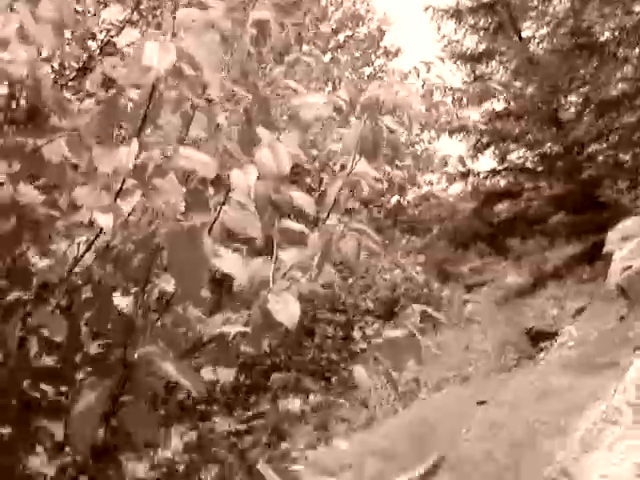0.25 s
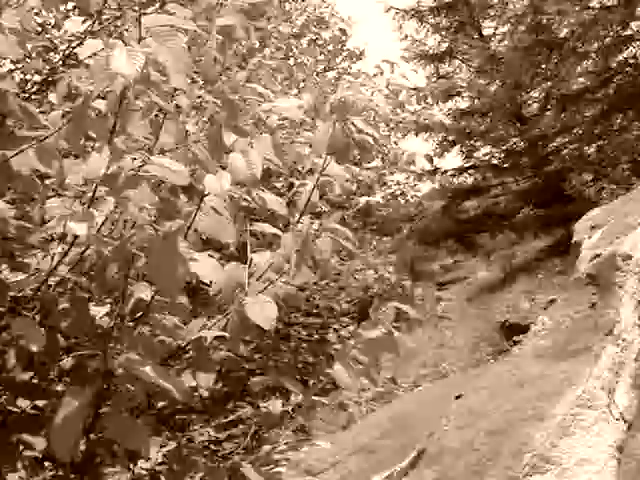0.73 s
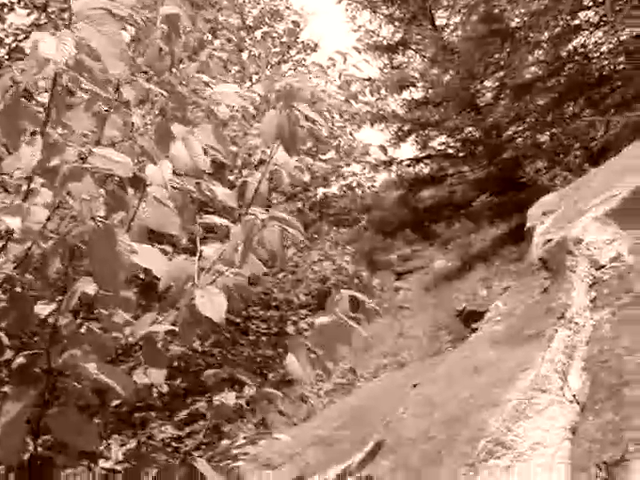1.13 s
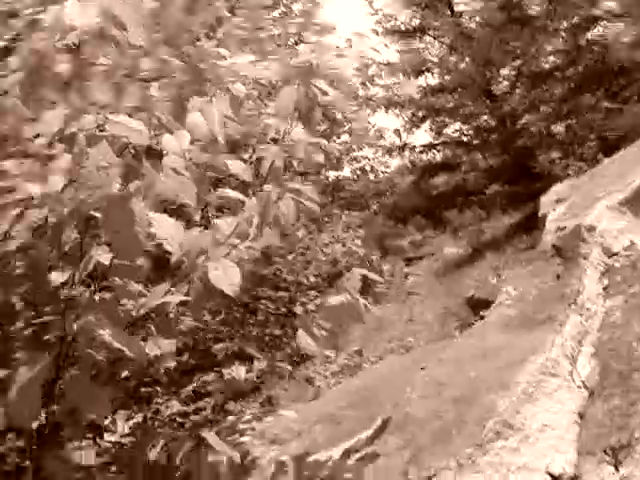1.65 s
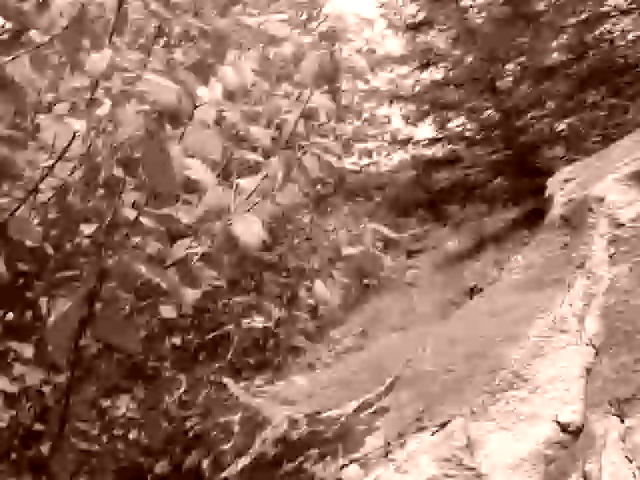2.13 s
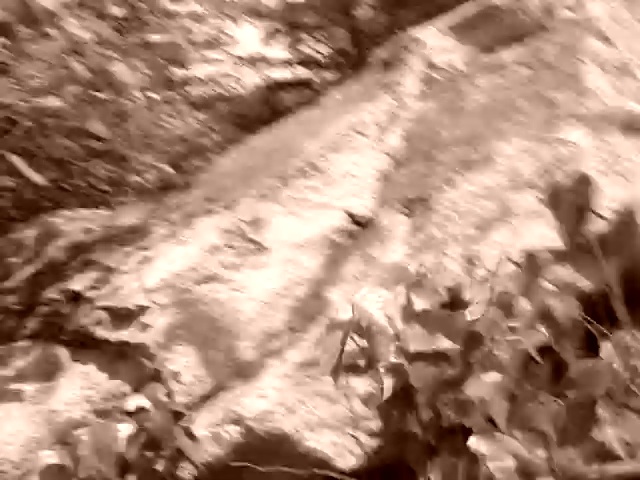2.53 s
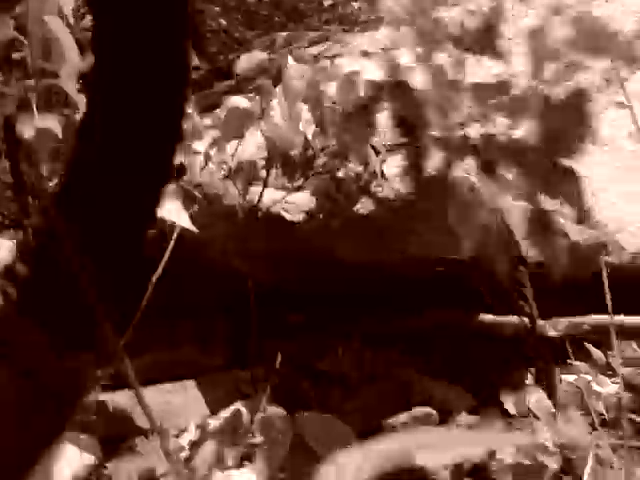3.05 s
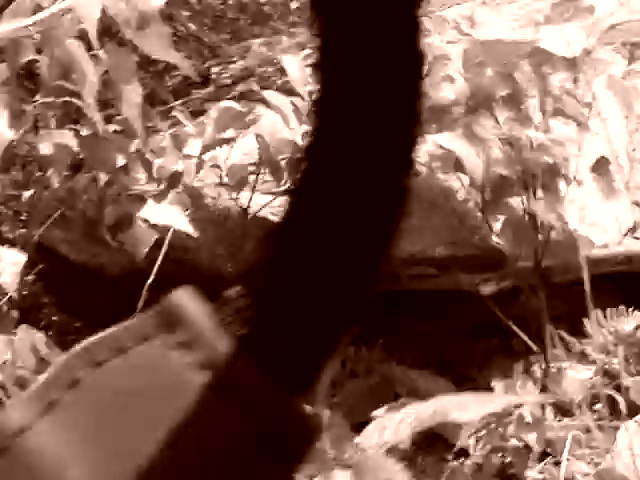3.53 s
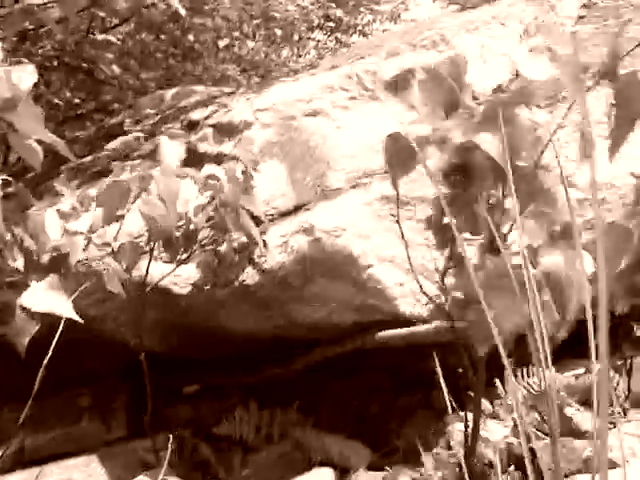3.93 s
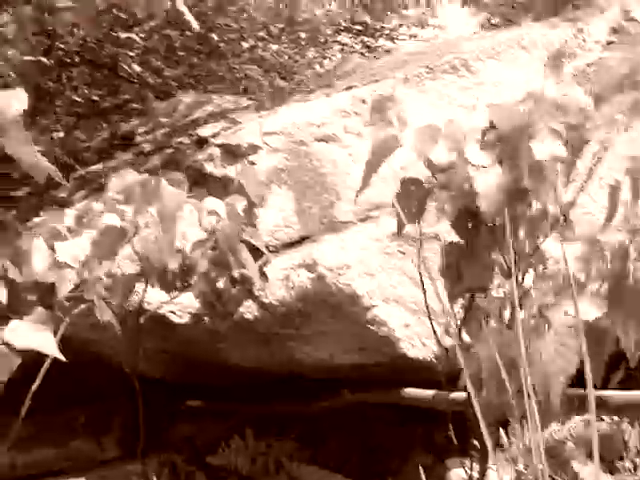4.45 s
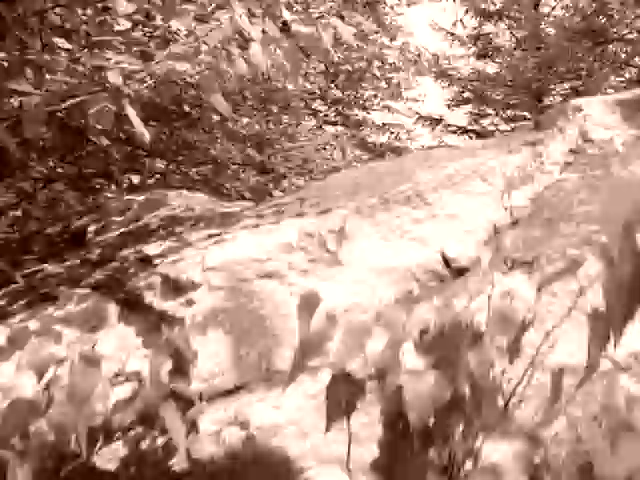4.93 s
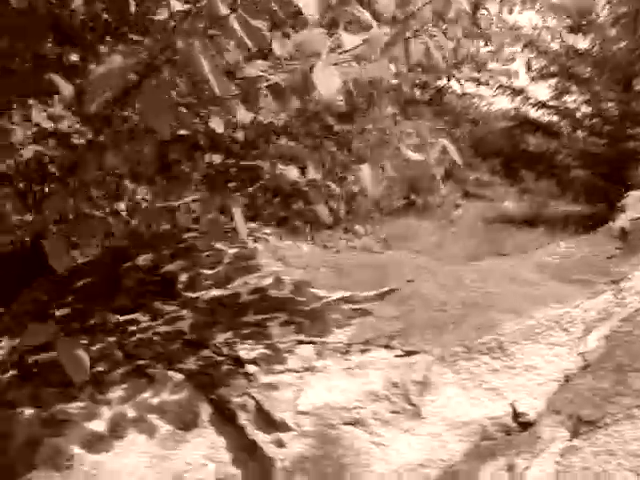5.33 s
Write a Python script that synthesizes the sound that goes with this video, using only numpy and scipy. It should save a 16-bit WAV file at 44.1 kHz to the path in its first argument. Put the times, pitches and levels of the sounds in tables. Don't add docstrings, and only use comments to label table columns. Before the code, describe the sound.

Outdoors in brushy woods, a rattlesnake under a rock ledge gives an unbroken, very fast dry buzz, high and fizzy. Close to a small hand-held camera microphone, boots press and scuff crisp leaves, stems rub, and twigs snap. The snaps thicken into a loud cluster midway, then come as scattered sharp cracks. The rattle weakens in the last half second over faint woodland air.

```python
import sys
import numpy as np
from scipy import signal
from scipy.fft import rfft, irfft
from scipy.io import wavfile
from scipy.ndimage import uniform_filter1d, minimum_filter1d

SR = 44100
rng = np.random.default_rng(int(sys.argv[2]) if len(sys.argv) > 2 else 0)


def store_wav(level_fs):
    pcm = np.round(np.clip(np.atleast_2d(level_fs), -1, 1) * 32767)
    wavfile.write(sys.argv[1], SR, pcm.T.astype(np.int16))


def amplitude_ratio(level_db):
    exponent = np.asarray(level_db, float) / 20
    return 10 ** exponent


N = 246519
T = np.arange(N) / SR


def evened(x):
    return x / np.sqrt(np.mean(x ** 2) + 1e-20)


def drift(length, smooth_samples):
    return evened(uniform_filter1d(rng.standard_normal(length), smooth_samples))


def columns(rows):
    s, *values = np.transpose(rows)
    return [np.interp(T, s, v) for v in values]


def coloured(x, points):
    f, db = np.transpose(points)
    hz = np.fft.rfftfreq(len(x), 1 / SR)
    gain_db = np.interp(np.log(hz + 1), np.log(f + 1), db)
    return evened(irfft(rfft(x) * amplitude_ratio(gain_db), len(x)))


def band(x, low_hz, high_hz, order=2):
    limits_hz = np.clip([low_hz, high_hz], 20, SR / 2.2)
    sos = signal.butter(order, limits_hz, "bandpass", fs=SR, output="sos")
    return evened(signal.sosfilt(sos, x))


def crackle(length, per_s, spread_db):
    chance, size, sign = rng.random((length, 3)).T
    clicks = chance < per_s / SR
    return clicks * amplitude_ratio(-spread_db * np.log(size + 0.0058)) * np.sign(sign - .5)


def track(events):
    out = np.zeros(N)
    for s, sound in events:
        part = out[round(s * SR):][:len(sound)]
        part += sound[:len(part)]
    return out


def ringing(modes, stroke):
    out = np.zeros(N)
    for hz, width_hz, db in modes:
        drift_db = 1.6 * drift(N, 7000)
        lag_samples = int(rng.integers(0, 120))
        knocks = crackle(N, 700, 0.61) * np.roll(stroke, lag_samples)
        out += amplitude_ratio(db + drift_db) * band(knocks, hz - width_hz / 2, hz + width_hz / 2, order=1)
    return evened(out)


def rattle():
    # (time [s], level [dB], extra treble where no leaves screen it [dB])
    buzz_curve = [(0, -40, -3), (.45, -40, -3.5), (.89, -39.5, -3), (1.31, -40, -0.5), (1.77, -39.5, -3),
                  (2.3, -40, 0), (2.6, -37.5, -4.5), (2.96, -39, 0), (3.11, -37, 0), (3.7, -38, 1.5),
                  (3.95, -37, -3), (4.28, -38.5, -4), (4.89, -38, -8.5), (5.07, -40, 0), (5.22, -47, 0.5),
                  (5.4, -49, -10), (5.59, -52, -1)]
    # (time [s], shake rate [1/s], unevenness of the two strokes [0-1], beat depth [0-1])
    shake_curve = [(0, 80, .3, .27), (1.2, 79, .3, .22), (2.4, 77.5, .25, .2), (3.2, 77.5, .1, .27),
                   (3.8, 77, .05, .42), (4.3, 76, .12, .35), (4.8, 75, .45, .3), (5.59, 72, .4, .27)]
    # (time [s], squareness [0-1])
    ledge_curve = [(0, 0), (1.1, 0), (1.5, .5), (2.7, .3), (3.4, .3), (4.3, .9), (5, .4), (5.59, .4)]
    # (frequency [Hz], density [dB per Hz])
    shell_spectrum = [(2500, -45), (3900, -28), (4600, -6), (6000, -2), (7500, -1), (8500, -2), (9500, -2),
                      (10300, -2)]
    # (frequency [Hz], width [Hz], level [dB])
    near_segments = [(4930, 280, -2), (6230, 300, 0), (7280, 260, 0), (8550, 260, -6)]
    # (frequency [Hz], width [Hz], level [dB])
    far_segments = [(6000, 280, -3), (6800, 280, 0), (7800, 280, 0), (8850, 280, -2), (9400, 350, -5)]
    near_db, near_gain_db, far_db, far_loss_db = -9, 7, -4, -10
    low_db, top_db = -6.5, -5

    rate_hz, uneven, depth = columns(shake_curve)
    phase = 2 * np.pi * (np.cumsum(rate_hz) / SR + .035 * drift(N, 1500))
    beat = (1 - uneven) * np.cos(2 * phase) + uneven * np.cos(phase)
    stroke = np.maximum(1 + depth * beat, 0)

    facing, = columns(ledge_curve)
    buzz = coloured(crackle(N, 12000, 0.97) * stroke, shell_spectrum)
    buzz += amplitude_ratio(near_db + near_gain_db * facing) * ringing(near_segments, stroke ** 2)
    buzz += amplitude_ratio(far_db + far_loss_db * facing) * ringing(far_segments, stroke ** 2)

    level_db, treble_db = columns(buzz_curve)
    low_sway_db, mid_sway_db, top_sway_db = [1.0 * drift(N, 4000) for _ in range(3)]
    low = amplitude_ratio(low_db + low_sway_db) * band(buzz, 4200, 5815, order=6)
    middle = amplitude_ratio(mid_sway_db) * band(buzz, 5710, 8800, order=4)
    top = amplitude_ratio(top_db + treble_db + top_sway_db) * band(buzz, 8650, 12900, order=4)
    return amplitude_ratio(level_db + 1.5) * (low + middle + top)


def leaves():
    # (time [s], weight [dB], dryness [0 soft tread - 1 crisp])
    litter_curve = [(0, -51.5, 0.49), (.3, -50.5, 0.74), (.65, -56, 0.57), (1.0, -52.5, 0.71),
                    (1.2, -59, 0.7), (1.5, -52, 0.71), (1.75, -55.5, 0.52), (1.99, -46, 0.71),
                    (2.29, -52.5, 0.56), (2.54, -41, 0.51), (2.7, -45.5, 0.57), (3.05, -45.5, 0.86),
                    (3.3, -50.5, 0.73), (3.75, -51, 0.88), (4.27, -57.5, 0.64), (4.78, -59.5, 0.55),
                    (4.92, -47, 0.8), (5.59, -58, 0.33)]
    tread_tilt_db, stems_db, edges_tilt_db = -15, 1, 34
    weight_db, dry = columns(litter_curve)
    clumps = amplitude_ratio(2.0 * drift(N, 300))
    tread = amplitude_ratio(tread_tilt_db * (dry - .5)) * band(crackle(N, 3000, 3.3) * clumps, 253, 886)
    stems = amplitude_ratio(stems_db) * band(crackle(N, 4000, 1.9) * clumps, 690, 2800)
    crisp = amplitude_ratio(edges_tilt_db * (dry - .5)) * band(crackle(N, 5000, 1.8) * clumps, 2650, 4600)
    return amplitude_ratio(weight_db) * (tread + stems + crisp)


def air():
    # (frequency [Hz], density [dB per Hz])
    air_spectrum = [(20, -19), (60, -9), (150, -5.5), (350, -8.5), (700, -7), (1500, -21), (3500, -19.5),
                    (6000, -26.5)]
    return amplitude_ratio(-56.5) * coloured(rng.standard_normal(N), air_spectrum)


def drag(length_s, db, hz, width_hz, swell):
    u = np.linspace(0, 1, round(length_s * SR))
    grit = crackle(14000, 9000, 1.3) * amplitude_ratio(1.7 * drift(14000, 90))
    f = np.linspace(20, 11000, 120)
    curl_db = 3.0 * drift(len(f), 3)
    colour_db = -6 * abs(2 * (f - hz) / width_hz) ** 4 + curl_db
    burst = coloured(grit, np.c_[f, np.maximum(colour_db, -50)])[:len(u)]
    swell = np.clip(swell, 0, 1)
    shape = (1 - swell) * (1.2 - u) + swell * (u + 1.1)
    taper = np.clip(40 * length_s ** 2 + 0.0053, 0, 1)
    return amplitude_ratio(db) * burst * evened(shape) * signal.windows.tukey(len(u), taper)


def presses():
    # (time [s], length [s], level [dB], centre [Hz])
    press_rows = [(0.09, 0.0058, -40, 850), (0.393, 0.014, -41.5, 1200), (0.441, 0.12, -46.5, 1010),
                  (0.607, 0.059, -44, 750), (0.611, 0.015, -47.5, 430), (1.006, 0.056, -47.5, 720),
                  (1.778, 0.18, -45.5, 990), (1.902, 0.14, -43.5, 814), (2.383, 0.0063, -30.5, 620),
                  (2.499, 0.013, -38, 810), (2.531, 0.046, -39, 334), (2.597, 0.021, -31, 610),
                  (2.81, 0.11, -42.5, 503), (3.004, 0.061, -47, 670), (3.865, 0.019, -34.5, 2000),
                  (3.898, 0.019, -29, 1550), (4.585, 0.075, -43, 530), (5.176, 0.013, -42.5, 765),
                  (5.501, 0.011, -39.5, 796), (0.605, 0.0087, -39.5, 1100), (5.421, 0.039, -49, 696),
                  (3.526, 0.069, -41.5, 710), (3.87, 0.1, -43, 607), (3.933, 0.29, -45.5, 1000),
                  (3.423, 0.012, -46.5, 700), (1.323, 0.12, -51, 313), (4.361, 0.17, -47.5, 1200),
                  (1.019, 0.1, -51, 284), (4.598, 0.051, -39, 1400), (4.798, 0.093, -53.5, 338),
                  (0.086, .3, -60.5, 300)]
    return track((s, drag(length_s, db, hz, 1.38 * hz, 0.21)) for s, length_s, db, hz in press_rows)


def snap(db, hz, knock_db, knock_hz, t60_s):
    rise_s, crack = .001, 1.1 * 0 + 3.0
    t = np.arange(2000) / SR
    after = np.maximum(t - rise_s, 0) / [[t60_s], [1.1 * t60_s]]
    shape = amplitude_ratio(-60 * after) * np.minimum(t / rise_s, 1)
    splinters = rng.standard_normal((2000, 2)).T * shape
    splinters[:, round(rise_s * SR)] = crack
    ring = evened(np.sin(2 * np.pi * hz * t) * shape[0])
    ring += .5 * band(splinters[0], hz * .8, hz * 1.2)
    ring += 0.9 * band(splinters[0], 1410, 5200, order=4)
    knock = evened(np.sin(2 * np.pi * knock_hz * t) * shape[1])
    knock += 0.7 * band(splinters[1], 350, 1600)
    return amplitude_ratio(db) * (ring / abs(ring).max() + amplitude_ratio(knock_db) * knock / abs(knock).max())


def sticks():
    # (time [s], peak [dB], ring [Hz], knock [Hz])
    stick_rows = [(.0885, -28.5, 1770, 846), (0.116, -34, 2100, 1010), (.439, -34, 2710, 1070),
                  (1.589, -34, 1810, 800), (2.3824, -27.5, 3100, 450), (2.4271, -24.5, 2023, 443),
                  (2.4407, -24, 3090, 1670), (2.582, -17, 2120, 960), (2.588, -16, 3150, 870),
                  (2.9681, -24, 3580, 1720), (5.544, -37.5, 3700, 685)]
    return track((s, snap(db, hz, 1.5, knock_hz, .02)) for s, db, hz, knock_hz in stick_rows)


def rubs():
    # (time [s], length [s], level [dB], centre [Hz])
    rub_rows = [(0.33, 0.039, -38, 2610), (1.995, 0.078, -41.5, 1560), (2.009, 0.067, -39.5, 2700),
                (2.02, 0.066, -37, 3390), (0.17, 0.022, -41, 2800), (1.04, 0.065, -38.5, 2570),
                (1.045, .07, -42, 3340), (1.355, 0.057, -43, 3000), (.838, .012, -40, 2700),
                (0.62, .02, -45.5, 420), (3.554, 0.031, -32, 3200), (3.536, 0.022, -35, 2620),
                (3.821, .028, -34.5, 3130), (3.922, .05, -40.5, 3600), (4.038, 0.067, -39, 3300),
                (4.054, .03, -39, 2240), (4.602, 0.029, -36.5, 2600), (5.008, 0.2, -44.5, 1430),
                (4.911, 0.035, -44, 2100), (4.93, 0.057, -35, 3050)]
    return track((s, drag(length_s, db, hz, 360, 0.45)) for s, length_s, db, hz in rub_rows)


def scuffs():
    # (time [s], length [s], level [dB], swell [0 starts hard - 1 grows])
    scuff_rows = [(0.172, 0.027, -37, 0.8), (.223, 0.06, -31, 0.52), (0.328, 0.058, -37.5, 0.95),
                  (0.688, 0.044, -45, 0.41), (0.824, 0.028, -35.5, 0.43), (1.036, 0.1, -38, 0.05),
                  (1.329, 0.092, -36.5, 0.74), (1.871, 0.13, -35.5, 0.72), (2.654, .035, -54, 0.38),
                  (2.745, 0.012, -39, .3), (2.7587, 0.0074, -30, .8), (2.846, 0.014, -37, .3),
                  (2.868, 0.022, -40, .4), (2.89, 0.016, -33.5, 0.44), (2.922, 0.015, -33, .6),
                  (2.943, 0.0076, -36, 0.56), (3.003, 0.06, -36, 0.34), (3.172, 0.01, -41, .5),
                  (2.399, .005, -36, .5), (2.493, 0.053, -40.5, .3), (2.809, 0.004, -37, 0.26),
                  (.699, 0.011, -40, .3), (3.123, 0.012, -29.5, 0.58), (3.13, 0.068, -39, 0.14),
                  (3.525, 0.054, -28, 0.5), (3.554, 0.02, -26.5, 0.12), (3.577, 0.055, -37, 0.11),
                  (3.819, 0.024, -34, 0.5), (3.888, 0.0096, -29, 0.5), (3.905, 0.054, -33.5, 0.13),
                  (4.043, 0.1, -34.5, 0.25), (4.432, 0.035, -22.5, 0.066), (4.464, 0.035, -38, 0.41),
                  (4.588, 0.042, -30, 0.57), (4.865, 0.038, -35, 0.19), (4.9, 0.12, -36.5, 0.96),
                  (4.794, 0.075, -41, 0.47), (3.789, 0.11, -41.5, .5), (3.927, 0.17, -39, 0.38),
                  (4.132, 0.13, -49.5, 0.13), (4.555, 0.036, -39, .7), (4.636, .02, -43, .1),
                  (4.359, 0.074, -43, 0.86), (4.47, 0.087, -45.5, 0.18)]
    hz_per_db, width_hz = 42, 4100
    return track((s, drag(length_s, db, 3725 + hz_per_db * (db + 35.0), width_hz, swell))
                 for s, length_s, db, swell in scuff_rows)


def twigs():
    # (time [s], peak [dB], ring [Hz], knock [Hz])
    twig_rows = [(.395, -25, 2970, 1020), (0.6052, -19.5, 2530, 1190), (0.6167, -22, 2380, 430),
                 (0.6308, -29, 2700, 1010), (1.541, -18, 3020, 803), (2.1272, -30, 2870, 1650),
                 (2.174, -15.5, 3250, 1700), (2.354, -15.5, 3530, 1700), (2.4536, -19.5, 2820, 830),
                 (2.472, -15.5, 3240, 895), (2.6823, -20, 3360, 790), (2.764, -12.5, 3500, 930),
                 (2.7994, -16.5, 2530, 700), (2.8151, -15.5, 3020, 495), (3.425, -19, 2920, 1190),
                 (3.9, -12, 2600, 1730), (3.904, -12.5, 3100, 1910), (4.561, -26, 2670, 865),
                 (4.6666, -31, 4500, 595), (4.8099, -13, 3385, 1630), (5.1015, -12, 3090, 1090),
                 (5.4461, -27.5, 3010, 400), (5.473, -43, 3050, 456), (5.5046, -22, 3530, 785)]
    return track((s, snap(db, hz, -10, knock_hz, .021)) for s, db, hz, knock_hz in twig_rows)


def puff(db, hz, length_s):
    t = np.arange(round(length_s * SR)) / SR
    return -amplitude_ratio(db) * np.sin(2 * np.pi * hz * t) * signal.windows.tukey(len(t), .6)


def puffs():
    # (time [s], level [dB], frequency [Hz], length [s])
    puff_rows = [
        (0.402, -49, 117, 0.02),
        (2.583, -27.5, 165, 0.019),
        (2.22, -53, 92.08, 0.056),
        (4.121, -40.5, 170, 0.015),
        (4.635, -45, 158, 0.019),
        (5.127, -51.5, 60, 0.025),
        (5.441, -48, 207, 0.019),
        (5.566, -39, 72, 0.053),
    ]
    return track((s, puff(db, hz, length_s)) for s, db, hz, length_s in puff_rows)


def stalks():
    # (time [s], peak [dB], ring [Hz])
    stalk_rows = [(0.645, -19.5, 2740), (0.668, -24, 2810), (1.0114, -24, 2110), (1.47, -28, 4430),
                  (2.1, -40, 3430), (2.163, -35, 3500), (2.2173, -23, 3070), (2.409, -10.5, 3470),
                  (2.519, -21.5, 3970), (2.6273, -30, 3150), (2.6164, -21.5, 3100), (4.945, -24, 2230),
                  (3.1006, -20.5, 3180), (3.124, -19, 4260), (3.328, -14.5, 2960), (3.548, -8.5, 2770),
                  (3.8097, -22, 4300), (3.8168, -20, 3000), (4.126, -28, 3900), (4.151, -27, 4400),
                  (4.4312, -25, 4225), (4.633, -16.5, 2180), (4.948, -23, 2940), (4.9694, -15.5, 3540),
                  (5.0584, -16.5, 2680), (5.059, -16, 4400)]
    return track((s, snap(db, hz, -18, 1500, .019)) for s, db, hz in stalk_rows)


def swishes():
    # (time [s], length [s], level [dB], centre [Hz])
    swish_rows = [
        (1.889, 0.18, -32.5, 5660),
        (2.65, 0.04, -46, 7300),
        (3.528, 0.067, -32.5, 7010),
        (4.428, 0.046, -30, 5730),
        (5.028, 0.016, -32, 6600),
    ]
    return track((s, drag(length_s, db, hz, 6100, 0.45)) for s, length_s, db, hz in swish_rows)


def jolts():
    # (time [s], step [dB])
    jolt_rows = [
        (2.413, -27),
        (2.616, -35),
        (2.628, -31.5),
        (2.761, -28.5),
        (3.55, -31.5),
        (4.086, -28.5),
        (4.432, -33.5),
        (4.451, -43),
    ]
    drain_s, rise_s = 0.012, 0.000078
    t = T[:4000]
    step = np.exp(-t / drain_s) * (1 - np.exp(-t / rise_s))
    return track((s, amplitude_ratio(db) * step) for s, db in jolt_rows)


def flicks():
    # (time [s], length [s], level [dB], centre [Hz])
    flick_rows = [
        (2.6133, 0.0045, -32, 7500),
        (2.628, 0.0027, -20, 8800),
        (2.6545, 0.0042, -27.5, 8500),
        (2.662, .004, -32, 8400),
        (2.67, 0.0044, -32, 7800),
        (2.684, 0.0039, -28, 7600),
        (2.807, 0.0031, -38, 6000),
    ]
    return track((s, drag(length_s, db, hz, 6100, 0.45)) for s, length_s, db, hz in flick_rows)


def scene():
    steps = leaves() + presses() + scuffs()
    brush = rubs() + swishes()
    snaps = sticks() + twigs() + stalks()
    camera_hits = puffs() + flicks()
    return (rattle() + air() + steps + brush + snaps + camera_hits)[None]


def dropouts(x):
    # (time [s], length [s], low edge [Hz], high edge [Hz])
    lost_bands = [(.583, .018, 2200, 3900), (.205, .004, 2700, 3700), (.214, .007, 2700, 3900),
                  (.279, .009, 2500, 5300), (.62, .008, 3300, 5300), (.654, .012, 2800, 3400),
                  (.802, .018, 2300, 3700), (2.183, .018, 2700, 4300), (2.362, .036, 2500, 4300),
                  (2.382, .016, 3900, 5700), (2.398, .01, 4900, 5700), (2.484, .008, 2400, 3900),
                  (2.598, .008, 7200, 9000), (2.604, .012, 8800, 11000), (2.638, .013, 7500, 11000),
                  (2.689, .016, 5400, 6300), (2.697, .008, 5400, 9200), (2.78, .01, 2200, 3400),
                  (3.104, .012, 5170, 8300), (3.317, .006, 2100, 3100), (3.335, .006, 2100, 3100),
                  (4.402, .024, 5200, 5900), (4.414, .011, 3700, 4500), (5.013, .012, 5200, 8300),
                  (5.046, .008, 3900, 5800), (5.078, .02, 3600, 5300), (5.085, .012, 2300, 3700),
                  (5.111, .006, 2700, 6300), (5.454, .017, 5000, 7800), (5.478, .017, 3900, 6300),
                  (5.491, .009, 2700, 4700)]
    hz, t, z = signal.stft(x, SR, nperseg=256, noverlap=192)
    cells = rng.random((len(t) // 6 + 1, len(hz) // 3 + 1)).T
    cells = cells[np.arange(len(hz)) // 3][:, np.arange(len(t)) // 6]
    level_db = 10 * np.log10((abs(z[0]) ** 2).sum(0) + 1e-12)
    jump_db = -minimum_filter1d(-level_db, 40) - level_db
    chance = np.interp(hz, [2000, 4500, 5200, 9400, 9900], [0, .02, .1, .09, .12])[:, None]
    lost = cells < chance * (1 + np.clip(jump_db - 8, 0, 10) / 2.5)
    for s, length_s, low_hz, high_hz in lost_bands:
        inside = ((hz > low_hz) & (hz < high_hz))[:, None]
        lost = lost | inside & (t > s - .002) & (t < s + length_s + .002)
    return signal.istft(z * np.where(lost, amplitude_ratio(-53), 1), SR, nperseg=256, noverlap=192)[1][..., :N]


def band_limit(x):
    return signal.sosfilt(signal.butter(12, 10780, fs=SR, output="sos"), x)


def record(dry):
    heard = dropouts(dry + jolts())
    limit = signal.firwin(501, 10130, window=("kaiser", 10), fs=SR)
    mix = signal.oaconvolve(heard, limit[None], "same")
    return band_limit(mix)


dry = scene()
out = record(dry)
store_wav(out)
```